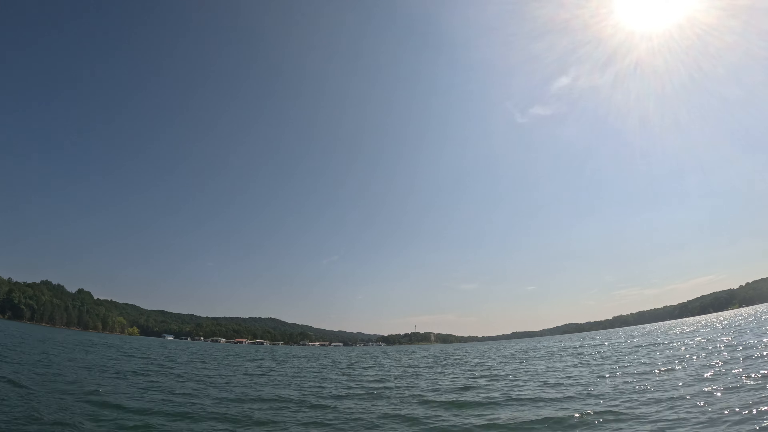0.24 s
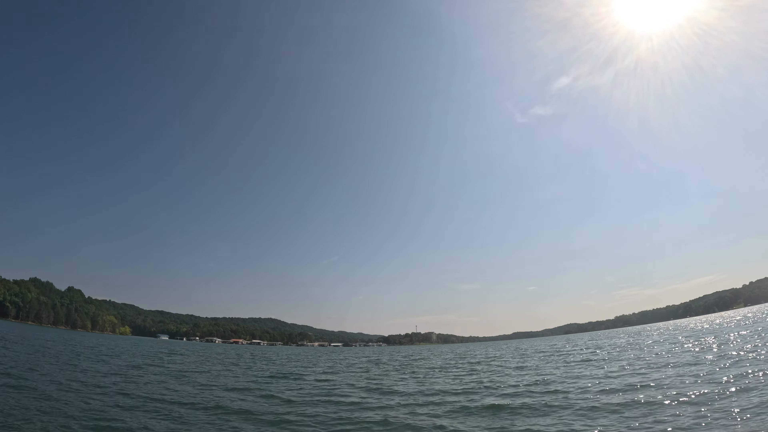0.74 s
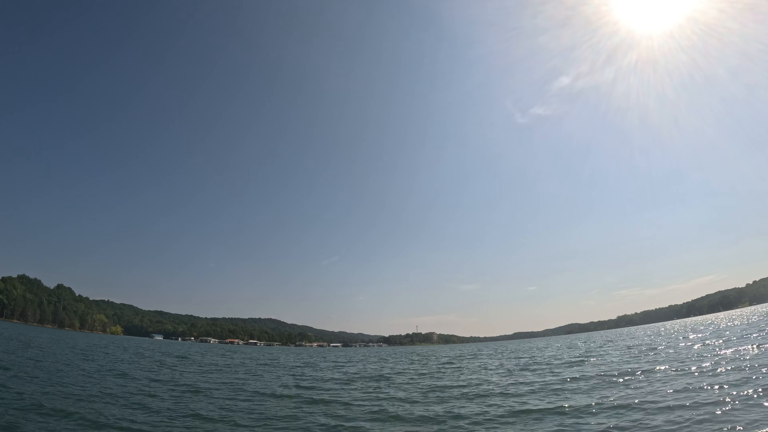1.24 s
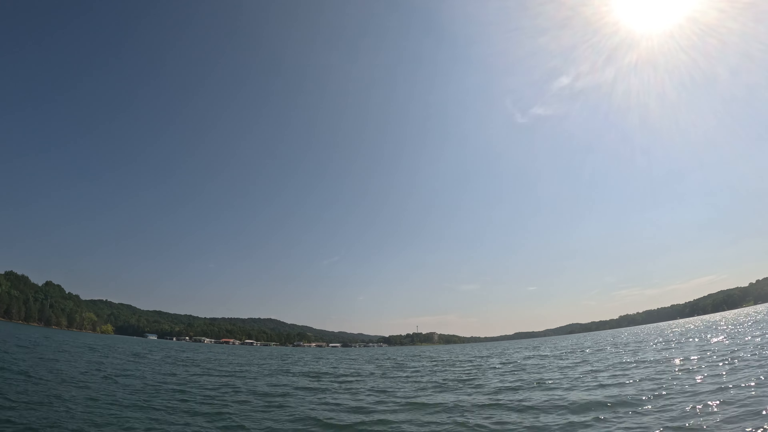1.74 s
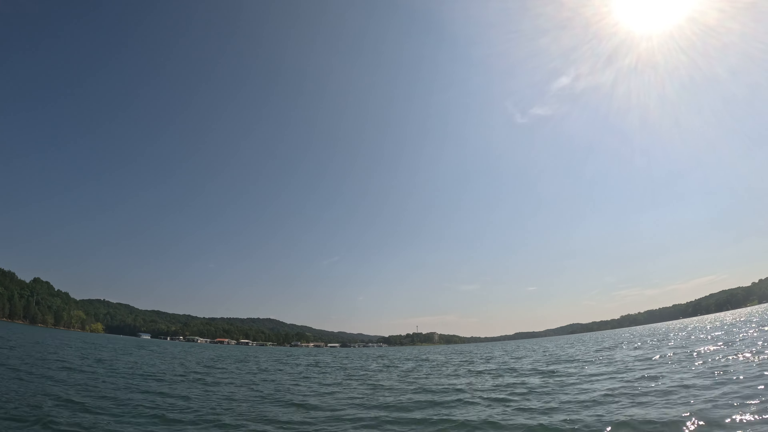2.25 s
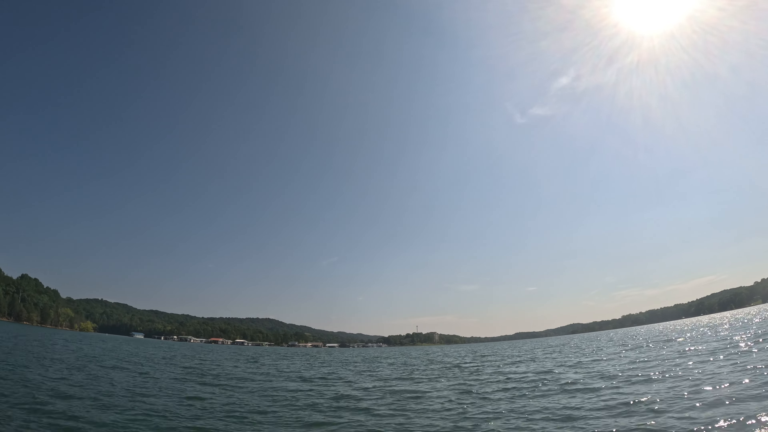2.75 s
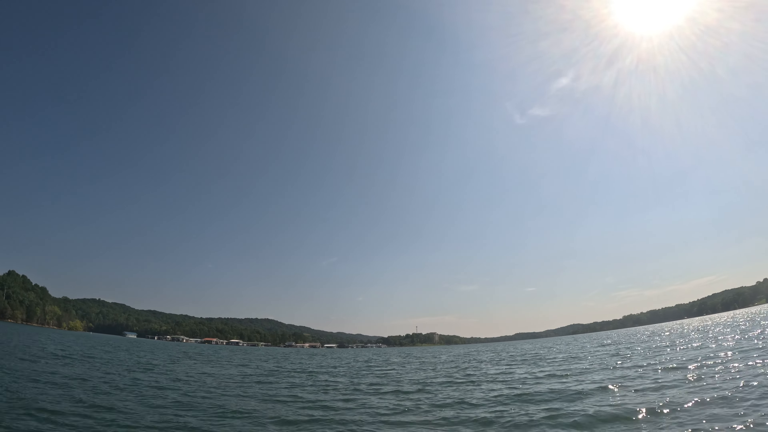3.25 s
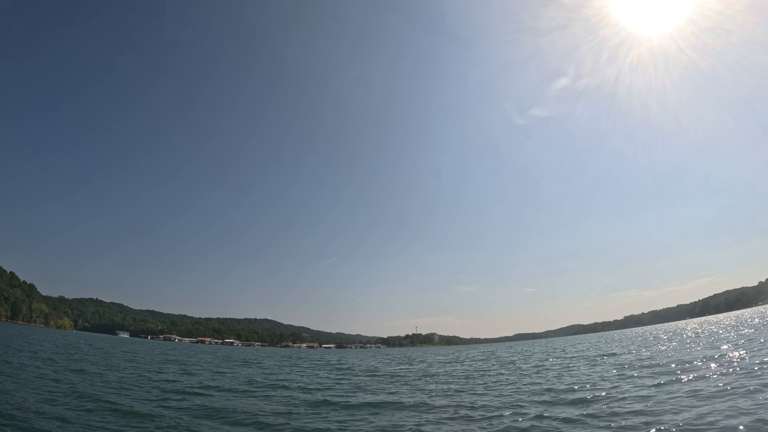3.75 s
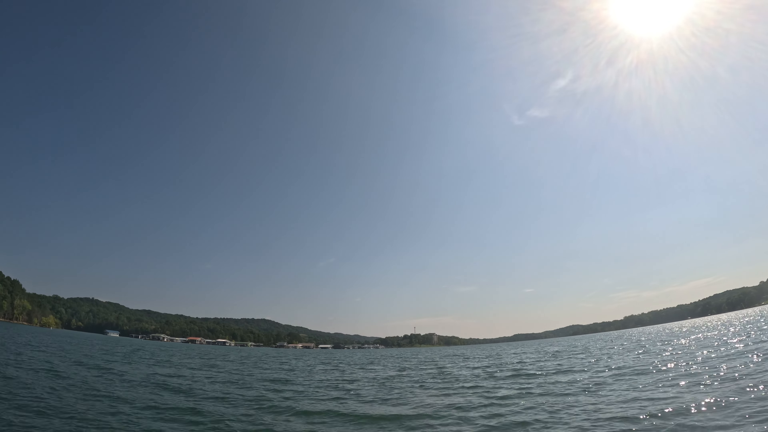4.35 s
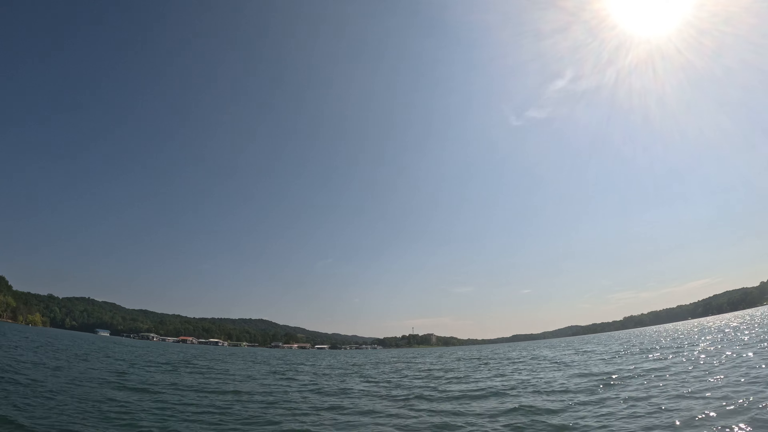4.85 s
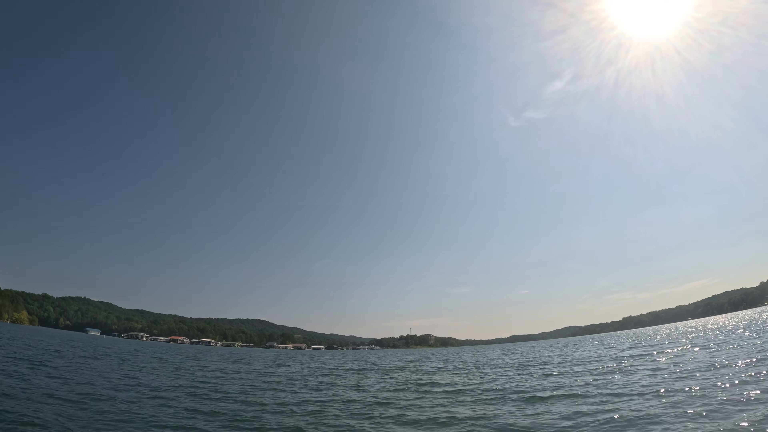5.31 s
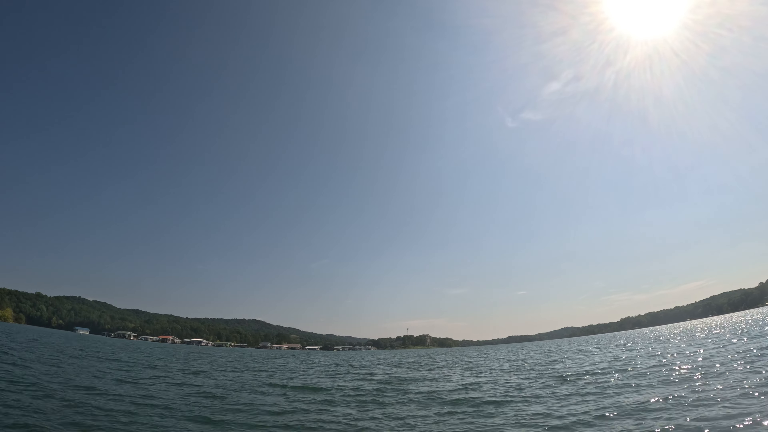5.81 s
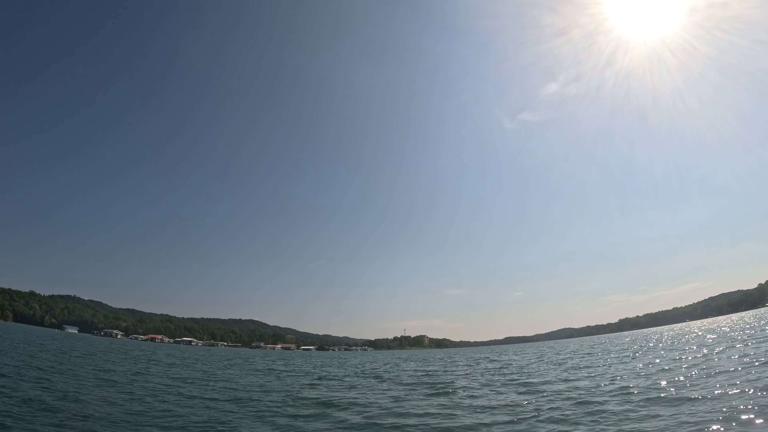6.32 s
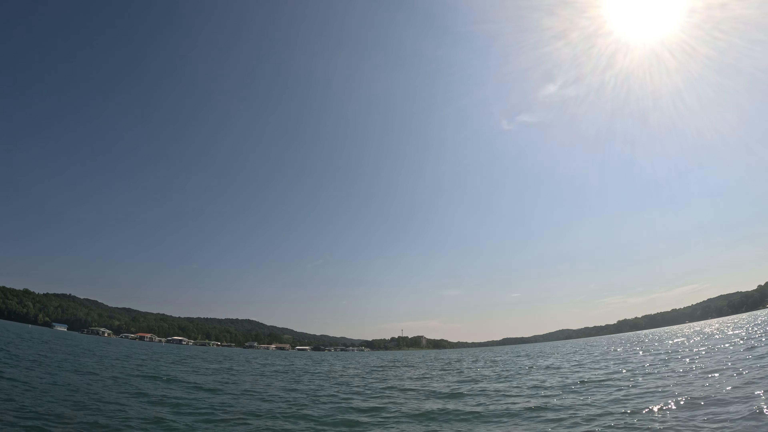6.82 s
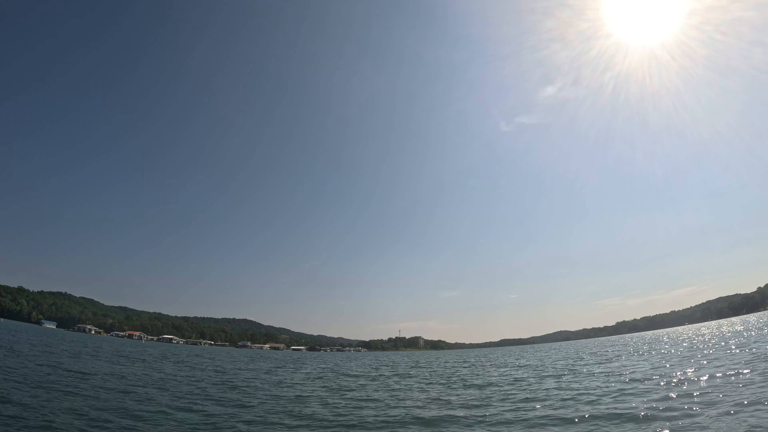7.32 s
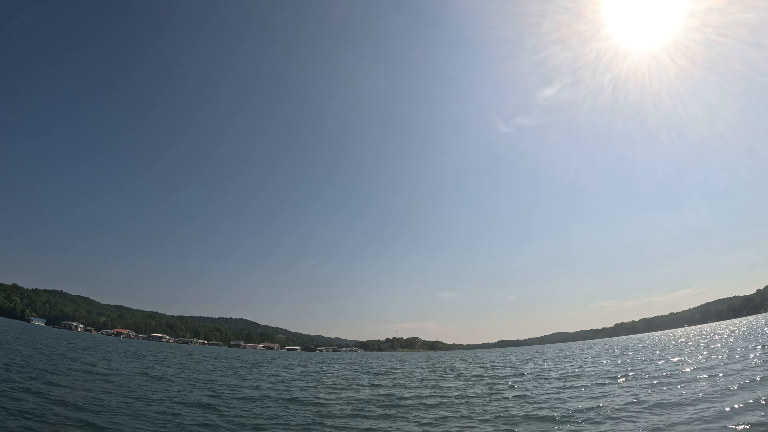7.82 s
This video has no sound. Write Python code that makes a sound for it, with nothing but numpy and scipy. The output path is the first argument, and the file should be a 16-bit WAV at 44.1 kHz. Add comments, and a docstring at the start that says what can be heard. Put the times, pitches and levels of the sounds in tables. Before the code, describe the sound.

Heard from on board a personal watercraft on open water, wind buffets and slaps the microphone over a steady engine drone. Water rushes along the hull, with a few light ticks of landing drops. The drone steps lower as the rider eases off; later the spray softens and a low exhaust burble comes up while the wind keeps thumping.

```python
"""A three-cylinder engine drones under buffeting wind and the rush of water along a hull.
The microphone rides on board a personal watercraft crossing a lake, out in the air stream, where
eddies thump, flutter and snap against it. A few drops tick on the camera, whose limiter holds the
gusts down. The rider eases off in steps: the drone sinks, and from about 5 s the exhaust burbles."""
import sys
import numpy as np
from scipy import signal
from scipy.fft import rfft, irfft, next_fast_len
from scipy.io import wavfile
from scipy.ndimage import uniform_filter1d, minimum_filter1d

SR = 44100
rng = np.random.default_rng(int(sys.argv[2]) if len(sys.argv) > 2 else 0)


def persist_wave(psi):
    """Save psi, clipped to +-1, as 16-bit WAV."""
    counts = np.round(np.clip(psi, -1, 1) * 32767).astype(np.int16)
    wavfile.write(sys.argv[1], SR, np.atleast_2d(counts).T)


N = 355887

# air and water on the way across, as relative levels: (time [s], breeze [dB], buffeting [dB], spray [dB])
RIDE = [(0, -27.5, -23, -52), (1.15, -31, -21.5, -52.5), (1.7, -28, -22.5, -53),
        (2.15, -29.5, -19.5, -53.5), (3.2, -29, -24, -53.5), (3.9, -28.5, -21.5, -53.5),
        (4.95, -29.5, -20, -56.5), (5.35, -30, -24, -55.5), (5.85, -28, -19, -57.5), (6.7, -29, -22.5, -60),
        (7.2, -33, -21, -58.5), (7.75, -30.5, -20, -61.5), (8.07, -35.5, -22.5, -59)]
# spectrum of wind snapping right at the microphone: (frequency [Hz], level [dB])
SLAP_COLOUR = [(100, -8), (400, 11.5), (900, 4), (1600, 2), (2500, -4), (3300, -9.5), (4500, -25),
               (8000, -41), (13000, -62.5)]


def amp(db):
    """Decibels to gain."""
    return 10 ** (np.asarray(db) / 20)


def unit(x):
    """Scales to rms 1."""
    return x / np.sqrt(np.mean(x ** 2) + 1e-20)


def curves(rows):
    """Each column after a table's time column, at every sample."""
    times, *columns = np.transpose(rows)
    return [np.interp(np.arange(N) / SR, times, column) for column in columns]


def coloured(x, colour):
    """Filters x by a spectrum of (frequency [Hz], level [dB]) points."""
    hz, db = np.transpose(colour)
    size = next_fast_len(len(x))
    f = np.fft.rfftfreq(size, 1 / SR)
    gain = amp(np.interp(np.log(f + 1), np.log(hz), db))
    return irfft(rfft(x, size) * gain, size)[:len(x)]


def noise(colour):
    """Noise of rms 1 with the given spectrum."""
    return unit(coloured(rng.standard_normal(N), colour))


def wander(hz):
    """Random drift of rms 1, with changes up to about hz."""
    size = next_fast_len(N // 20 + 2)
    f = np.fft.rfftfreq(size, 20 / SR)
    slow = irfft(rfft(rng.standard_normal(size)) / (1 + (f / hz) ** 4), size)
    return unit(np.interp(np.arange(N) / 20, np.arange(size), slow))


def add(mix, s, sound):
    """Mixes a sound in at time s."""
    part = mix[max(round(s * SR), 0):][:len(sound)]
    part += sound[:len(part)]


def engine(lead_db=-0.4, waver_db=1.0, swell_db=0.68, wash_db=3.5, jitter=0.0017):
    """The engine, close by: firing and crank shake lead; unequal cylinders fill in the other orders."""
    # engine speed as the rider eases off: (time [s], four-stroke cycle rate [Hz])
    speed = [(0, 66.34), (0.8, 66.13), (1.15, 62.63), (1.32, 59.44), (2.0, 58.57), (2.26, 54.77),
             (3.3, 54.5), (3.6, 53.9), (4.05, 54.1), (4.62, 53.45), (4.8, 52.56), (5.3, 47.98),
             (5.55, 46.44), (6.1, 46.86), (6.7, 46.09), (7.25, 44.92), (7.65, 44.55), (8.07, 43.78)]
    # leading orders sliding through exhaust and hull resonances: (cycle rate [Hz], relative level [dB])
    firing = [(44, -38), (50, -39.5), (53.6, -25), (54.5, -25.5), (56, -36.5), (62, -35), (66.2, -23)]
    shake = [(44, -39.5), (46.5, -40.5), (49, -32), (52.5, -24.5), (53.7, -18.5), (54.1, -21), (54.45, -16),
             (55, -20), (58, -20), (66.2, -20)]
    firing_octave = [(44, -19.5), (45.5, -20.5), (46.6, -21), (48, -22), (52.5, -24.5), (54.3, -33),
                     (55.2, -25.5), (58.3, -20.5), (59.3, -34), (66.2, -34.5)]
    shake_octave = [(43.8, -19), (44.4, -27.5), (45, -25.5), (46.2, -45), (47.5, -28), (49.3, -25),
                    (53, -35.5), (58.8, -28), (62, -43.5), (66.2, -32.5)]
    # weaker orders: (multiple of the cycle rate, level at low [dB], middle [dB], high speed [dB])
    overtones = [(2, -42.5, -37, -34), (5, -46, -46, -34), (7, -33, -41.5, -33), (9, -40.5, -41.5, -40),
                 (10, -46, -40.5, -45.5), (11, -41, -49.5, -48), (12, -40, -53.5, -41),
                 (14, -47, -47.5, -50.5), (16, -61.5, -50, -65), (18, -51.5, -52, -66),
                 (19, -43, -54.5, -60), (20, -47.5, -53, -60)]
    cycle_hz, = curves(speed)
    unsteady_hz = cycle_hz * (1 + jitter * wander(hz=9.2))  # chop varies the load on the jet pump
    angle = 2 * np.pi * np.cumsum(unsteady_hz) / SR
    throttle = (cycle_hz - cycle_hz.min()) / np.ptp(cycle_hz)
    drone = np.zeros(N)
    for order, response in ((3, firing), (4, shake), (6, firing_octave), (8, shake_octave)):
        db = np.interp(cycle_hz, *np.transpose(response)) + lead_db
        db = db + waver_db * wander(hz=26) + swell_db * wander(hz=3.2)
        drone += amp(db) * np.cos(order * angle + 2 * np.pi * rng.random())
    for order, *levels_db in overtones:
        db = np.interp(throttle, [0, .5, 1], levels_db)
        db = db + wash_db * wander(hz=1.9)  # water washes over the exhaust outlet
        drone += amp(db) * np.cos(round(order) * angle + 2 * np.pi * rng.random())
    return np.sqrt(2) * drone


def buffeting(level_db=2.0, lump_db=1.3):
    """Large eddies press on the microphone."""
    # spectrum of the rumble: (frequency [Hz], level [dB])
    colour = [(5, 5.5), (20, -4.5), (50, 6), (85, 0), (135, 2), (220, -4.5), (320, -5), (500, -13),
              (1000, -42), (3000, -78.5)]
    _, buffet_db, _ = curves(RIDE)
    return amp(buffet_db + level_db) * unit(noise(colour) * amp(lump_db * wander(hz=16)))


def flutter(shed_hz=26, spread_hz=2.1, level_db=-1.0, waver_db=1.9):
    """Vortices shed in the air stream beat at a deep, unsteady rate."""
    # strength of the beat at the microphone: (time [s], relative level [dB])
    levels = [(0, -23.5), (0.8, -21.5), (1.5, -26), (1.8, -17.5), (2.1, -30), (2.4, -27), (3.0, -35.5),
              (3.5, -25), (4.4, -24), (5.9, -25.5), (6.7, -24.5), (8.07, -21.5)]
    strength_db = curves(levels)[0] + waver_db * wander(hz=6)
    angle = 2 * np.pi * np.cumsum(shed_hz + spread_hz * wander(hz=4.58)) / SR
    return np.sqrt(2) * amp(strength_db + level_db) * np.sin(angle)


def lull_db(half_width_s=0.022):
    """The brief dips in level that breeze and spray share."""
    # lulls: (time [s], change in the breeze [dB])
    lulls = [(0.395, -6.5), (0.99, -14), (1.64, -3), (2.12, -2.5), (4.1, -2), (4.58, -4), (6.1, -1),
             (6.39, -2), (6.465, -3.5), (6.88, -1), (7.49, -4.5)]
    t = np.arange(N) / SR
    return sum(db * np.exp(-((t - s) / half_width_s) ** 2) for s, db in lulls)


def wind_strength(rise_share=0.59):
    """Gain of the small eddies: the breeze plus gusts, each building more slowly than it drops."""
    # single gusts at the microphone: (time [s], relative peak [dB], length [s])
    gust_peaks = [(0.357, -17, 0.018), (0.457, -26, 0.027), (0.827, -24, .025), (1.04, -25, .035),
                  (1.156, -25.5, 0.061), (1.263, -25, 0.089), (1.37, -28, .04), (1.44, -25, 0.031),
                  (1.51, -27, 0.031), (1.57, -25, 0.027), (2.35, -27, 0.049), (3.078, -26, .035),
                  (3.932, -29.5, 0.033), (4.007, -26, 0.036), (4.25, -30.5, .04), (4.519, -28, .03),
                  (5.41, -30.5, 0.042), (5.865, -22, 0.033), (5.959, -27.5, 0.026), (6.05, -26, 0.023),
                  (6.178, -30, .04), (6.34, -31, 0.037), (6.427, -29, 0.029), (6.607, -22, 0.024),
                  (6.72, -31, .04), (6.85, -35.5, 0.034), (7.44, -29, 0.029), (7.6, -29, .06)]
    t = np.arange(N) / SR
    breeze_db, _, _ = curves(RIDE)
    power = amp(breeze_db + lull_db()) ** 2
    for s, db, length_s in gust_peaks:
        slope_s = length_s * np.where(t < s, rise_share, 1 - rise_share)
        power += amp(db) ** 2 * np.exp(-((t - s) / slope_s) ** 2)
    return np.sqrt(power)


def gusts(strength, level_db=5.5, lump_db=1.53, tear_db=2.0):
    """Small eddies tear past the microphone in ragged bursts."""
    # spectrum of the tearing air: (frequency [Hz], level [dB])
    colour = [(60, -15), (180, 7), (300, -1.5), (500, 0.5), (680, -4.5), (860, -5.5), (1100, -10),
              (2000, -20.5), (2600, -30.5), (3300, -30), (4500, -40.5), (8000, -61), (12000, -83.5)]
    ragged = amp(lump_db * wander(hz=30.4) + tear_db * wander(hz=214))
    return strength * amp(level_db) * unit(noise(colour) * ragged)


def crackle(strength, per_s=130, spread_db=3.5, level_db=-12.5):
    """The smallest eddies snap at the microphone port, a few of them hard."""
    sizes = amp(spread_db * np.minimum(rng.exponential(1, N), 3))
    signs = rng.choice([-1, 1], N)
    snaps = sizes * signs * (rng.random(N) < per_s / SR)
    return strength * amp(level_db) * unit(coloured(snaps, SLAP_COLOUR))


def spray(level_db=15.5, surge_db=0.5, splash_db=1.3, fizz_db=1.25, lull_share=0.45):
    """Spray thrown off the hull hisses close by, surging on each small wave."""
    # spectrum of the hiss from on board: (frequency [Hz], level [dB])
    colour = [(300, -3.5), (1000, 2.5), (2000, 1), (2550, -3.5), (3200, -2), (4400, -14), (5600, -17),
              (6600, -23), (8000, -26), (9900, -41), (11300, -40), (13400, -53)]
    _, _, spray_db = curves(RIDE)
    rush_db = spray_db + lull_share * lull_db()
    splashes = amp(surge_db * wander(hz=6.2) + splash_db * wander(hz=29.8) + fizz_db * wander(hz=500))
    return amp(rush_db + level_db) * unit(noise(colour) * splashes)


def bursts(rows, colour, decay_s, tail_db, level_db):
    """One sharp pulse of pressure for each row, with a short, fizzing tail."""
    t = np.arange(-SR // 200, SR // 25) / SR
    pulse = t == 0
    track = np.zeros(N)
    for s, db in rows:
        tail = (t > 0) * np.exp(-abs(t) / decay_s) * rng.standard_normal(len(t))
        snap = coloured(pulse + amp(tail_db) * tail / np.linalg.norm(tail), colour)
        add(track, s + t[0], amp(db + level_db) * snap / abs(snap).max())
    return track


def wind_slaps():
    """Wind slaps sharply, right on the microphone."""
    # slaps: (time [s], relative peak [dB])
    hits = [(0.1994, -14.5), (0.236, -20), (0.262, -14), (0.3628, -13), (0.4496, -13), (0.897, -13),
            (0.959, -20), (1.1662, -13.5), (1.26, -11), (1.377, -14), (1.4296, -12.5), (1.5688, -15),
            (1.8647, -19.5), (1.9053, -17), (2.3497, -23), (2.9302, -15.5), (3.1424, -15), (3.8458, -13),
            (3.9245, -16), (6.608, -18)]
    return bursts(hits, SLAP_COLOUR, decay_s=0.0036, tail_db=2.0, level_db=2.0)


def water_drops():
    """Drops strike the camera and tick, right beside the microphone."""
    # drops landing: (time [s], relative peak [dB])
    hits = [(0.8216, -33), (1.7377, -37), (2.3365, -34), (3.1034, -33), (3.3788, -40), (3.8287, -41),
            (4.5202, -34)]
    # spectrum of a tick: (frequency [Hz], level [dB])
    colour = [(800, -15), (3000, -3), (5500, 0.5), (8000, -5.5), (11000, -18.5), (14000, -36)]
    return bursts(hits, colour, decay_s=0.0012, tail_db=-3, level_db=3.0)


def exhaust_roar(burble_db=0.5):
    """At low throttle the exhaust burbles and stirs the resonances of the hull."""
    # the roar from on board: (time [s], level [dB])
    levels = [(0, -37), (4.6, -40), (5.2, -28.5), (5.85, -27), (6.6, -24), (7.15, -22.5), (7.6, -25),
              (8.07, -26)]
    # spectrum of the exhaust in the hull: (frequency [Hz], level [dB])
    colour = [(150, -29), (215, -14.5), (250, 9), (310, 5), (360, -2.5), (440, -15), (650, -7.5),
              (900, -15), (1050, -20), (2000, -70)]
    roar_db, = curves(levels)
    return amp(roar_db) * unit(noise(colour) * amp(burble_db * wander(hz=30)))


def scene():
    """Engine, wind and water at one on-board microphone, out on the lake."""
    slaps = wind_slaps()
    drops = water_drops()
    strength = wind_strength()
    wind = buffeting() + flutter() + gusts(strength) + crackle(strength) + slaps
    return (engine() + exhaust_roar() + wind + spray() + drops)[None]


def limiter(x, ceiling_db=-5.8, recovery_db_per_s=110, window_samples=90):
    """Turns down just ahead of each peak over the ceiling, then recovers."""
    over_db = np.maximum(20 * np.log10(abs(x) + 1e-9) - ceiling_db, 0)
    held_db = -minimum_filter1d(-over_db, size=window_samples)
    fall_db = np.arange(N) / SR * recovery_db_per_s
    cut_db = np.maximum.accumulate(held_db + fall_db) - fall_db
    return x * amp(-uniform_filter1d(cut_db, size=window_samples))


def record(dry, drive_db=-0.14, edge_hz=13400):
    """The camera limits the microphone signal, then cuts the top treble."""
    limited = limiter(dry[0] * amp(drive_db))
    lowpass = signal.firwin(511, edge_hz, window=("kaiser", 9), fs=SR)
    return signal.oaconvolve(limited, lowpass, "same")[None]


dry = scene()
out = record(dry)
persist_wave(out)
```